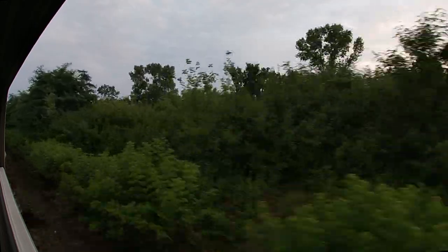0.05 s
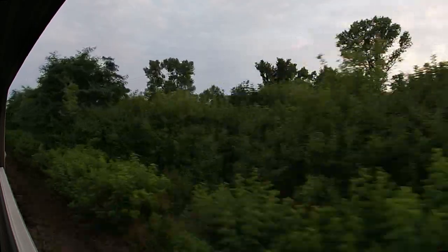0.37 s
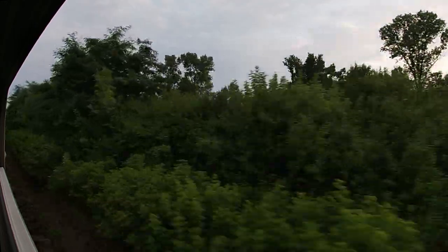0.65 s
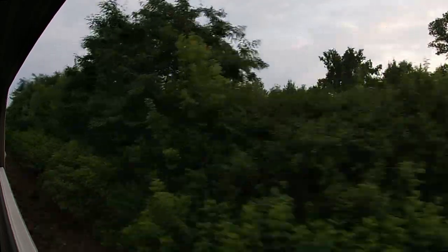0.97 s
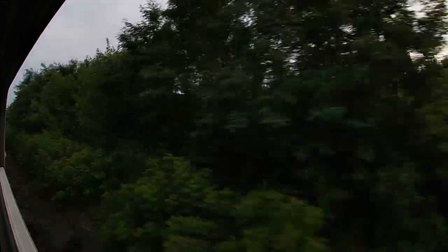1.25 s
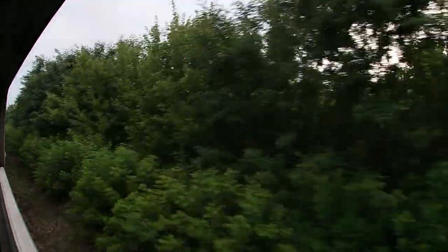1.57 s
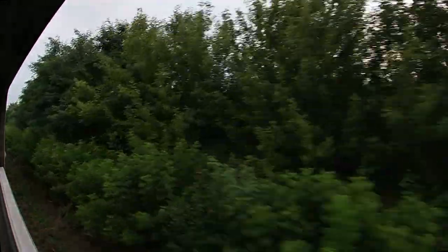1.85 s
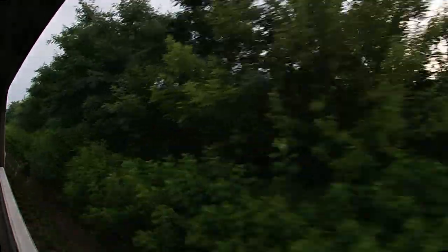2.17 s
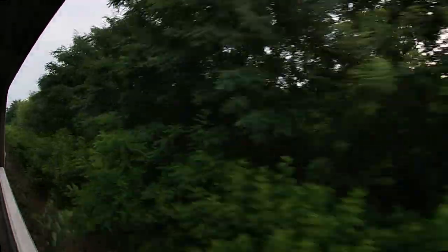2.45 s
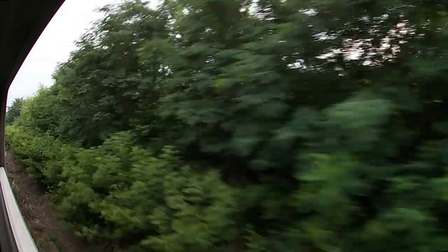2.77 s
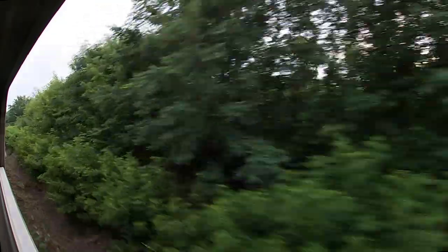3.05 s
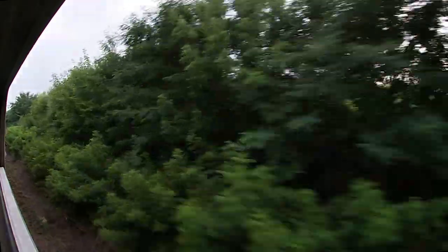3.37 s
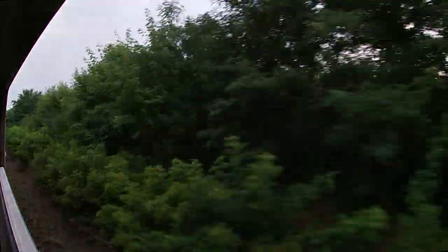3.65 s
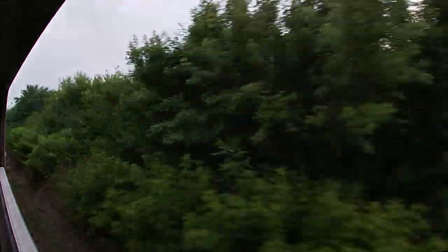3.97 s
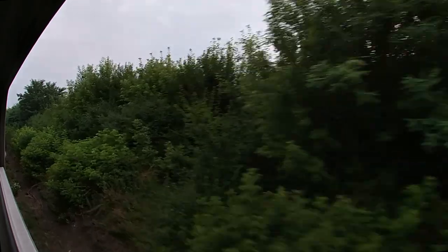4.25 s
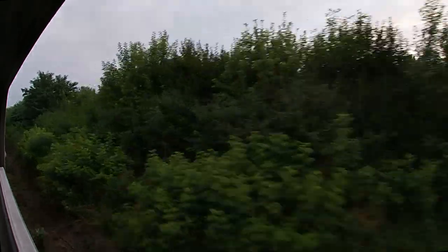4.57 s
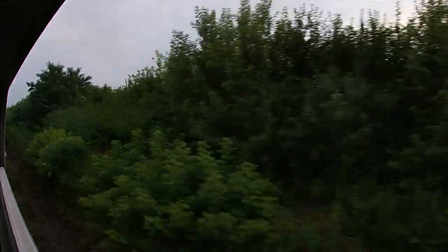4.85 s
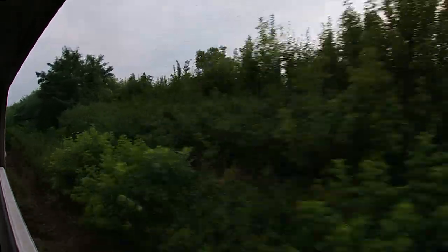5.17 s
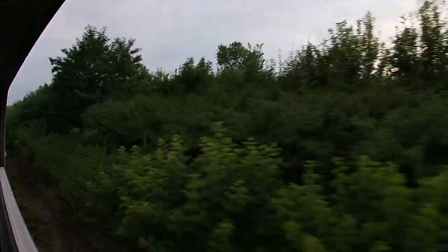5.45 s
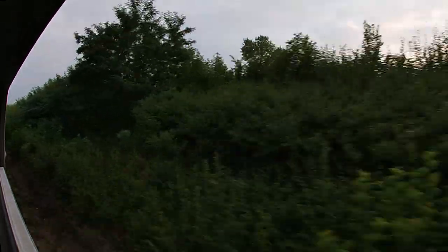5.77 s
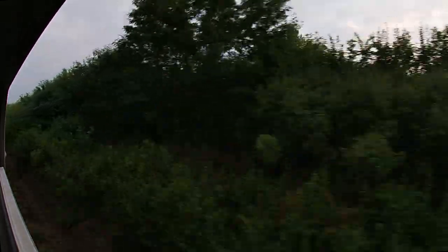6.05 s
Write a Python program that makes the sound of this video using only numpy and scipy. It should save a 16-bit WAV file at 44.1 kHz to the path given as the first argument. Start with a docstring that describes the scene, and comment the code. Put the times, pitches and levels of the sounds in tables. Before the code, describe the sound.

A moving train is heard from an open coach window for about six seconds. Wheels cross rail joints in groups of four clacks, two quick pairs, each group lasting under half a second. The groups begin at about 0.3, 1.3, 2.4, 3.5, 4.5 and 5.6 seconds. Every clack is a gritty steel crash with a short ring, a light rattle and a thud in the coach body, usually heaviest on the fourth hit. Some add a hollow knock, and an extra jolt lands near 4.9 seconds. Underneath runs a steady midrange wheel roar, with rail hiss and a howl that gently swells and fades. Deep, fluttering wind buffets the microphone throughout, with small gusts around 1.9, 2.9, 4.9 and 5.4 seconds. The pace stays even, and the top treble is dulled.

```python
"""Rail joints from an open coach window

Two neighbouring bogies cross a rail joint about once a second, four clacks each time. Every axle
gives a gritty crash, a ring of the wheel and a thud in the coach. Underneath, the wheels roar,
the rails howl and hiss, and air buffets the microphone. The top treble is dulled, and a limiter
ducks a little under the peaks."""
import sys
import numpy as np
from scipy.fft import rfft, irfft, next_fast_len
from scipy.io import wavfile
from scipy.ndimage import uniform_filter1d, minimum_filter1d, map_coordinates

SR = 44100
rng = np.random.default_rng(int(sys.argv[2]) if len(sys.argv) > 2 else 0)


def master_out(mix):
    """Clip the mix to full scale and print it as 16-bit PCM to the path in sys.argv[1]."""
    frames = np.transpose(np.atleast_2d(mix))
    ceiling = np.clip(frames, -1, 1)
    pcm = np.round(ceiling * 32767).astype(np.int16)
    wavfile.write(sys.argv[1], SR, pcm)


N = 273420
TIME = np.arange(N) / SR

# Axle hits, four to a joint: t/s, spray level/dB, rattle level/dB, bite level/dB, ring level/dB,
# thud level/dB
AXLE_HITS = [(0.287, -27, -36, -34, -38, -37), (.388, -31, -37.5, -39.5, -27.5, -23),
             (.602, -27, -35.5, -32, -30, -27), (.703, -28.5, -35.5, -29, -26.5, -15),
             (1.342, -30.5, -40.5, -38, -36, -31), (1.444, -30.5, -39, -36.5, -28.5, -26),
             (1.656, -31, -35.5, -37, -26.5, -20), (1.763, -30.5, -37, -33, -30.5, -14.5),
             (2.406, -27, -40, -38, -30.5, -28), (2.505, -30.5, -36, -46, -30.5, -28),
             (2.717, -28.5, -36.5, -34.5, -24.5, -20), (2.818, -28.5, -36, -37, -29, -13.5),
             (3.456, -32, -39, -40.5, -30.5, -30), (3.557, -31.5, -38, -39, -31.5, -26),
             (3.769, -33.5, -38.5, -39.5, -31.5, -35), (3.87, -34, -38, -41, -32, -15),
             (4.508, -33, -46.5, -47, -34.5, -23), (4.61, -30.5, -36.5, -38, -33, -26),
             (4.822, -26.5, -33, -34.5, -34, -19), (4.921, -33.5, -37.5, -34.5, -26, -15.5),
             (5.554, -31.5, -41.5, -42, -37, -24), (5.653, -32, -38, -39, -35, -28),
             (5.868, -30.5, -34, -35, -24.5, -26), (5.969, -31, -38, -38, -25, -22.5)]
# Tone of a hit's steely bite, rough clank, rattle and bright spray: f/Hz, level/dB
BITE_EQ = [(500, -12.5), (1100, -2), (1750, 1.5), (1920, -4.5), (2080, 6), (2170, -6.5), (2260, 4),
           (2500, -1), (2880, 0.5), (3300, -9.5), (6000, -33.5)]
CLANK_EQ = [(900, -20.5), (1400, -10), (1620, 4.5), (1800, -4.5), (2050, -15), (2800, -19.5), (5000, -49)]
RATTLE_EQ = [(1500, -12), (3100, -6.5), (3700, -0.5), (4000, 0), (4250, -1), (4750, -2.5), (5300, -1.5),
             (5900, -5), (7000, -6.5), (13000, -16)]
SPRAY_EQ = [(2500, -19.5), (5000, -8.5), (7000, -4.5), (9000, 0.5), (11000, 2.5), (13500, -4.5)]

def clacks():
    """The wheel cracks on the rail end, bites, clanks and rings; the gear rattles under a bright spray."""
    times, spray_db, rattle_db, bite_db, ring_db, _ = np.transpose(AXLE_HITS)
    grit = unit(amp(1.5 * wobble(450) + 0.9 * wobble(70)))
    crack_env = blows(times, bite_db, lead=0.012, rise=0.0043, t60=0.12, tail_db=-19, tail_t60=0.2)
    bite_env = blows(times, bite_db, lead=0.0077, rise=0.031, t60=0.5, tail_db=-19, tail_t60=0.65)
    bite = np.hypot(crack_env, bite_env) * noise(eq(BITE_EQ))
    clank = blows(times, ring_db - 5.5, lead=0.0033, rise=0.012, t60=0.1, tail_db=-18.5, tail_t60=0.4)
    clank *= noise(eq(CLANK_EQ))
    rattle = blows(times, rattle_db, lead=0.01, rise=0.028, t60=1.27, tail_db=-14, tail_t60=1.2)
    rattle *= noise(eq(RATTLE_EQ))
    spray = blows(times, spray_db, lead=0.001, rise=0.026, t60=0.5, tail_db=-11, tail_t60=1)
    spray *= noise(eq(SPRAY_EQ))
    ring = blows(times, ring_db, lead=0, rise=0.017, t60=0.11, tail_db=-8.5, tail_t60=1)
    ring *= levelled(wheel(), span_s=0.027)
    return grit * (bite + clank + rattle + spray + sizzle()) + ring


# Ringing modes of the steel wheel: f/Hz, width/Hz, level/dB
WHEEL_MODES = [(1545, 37, 12), (1601, 53, 6), (1720, 68, -16.5), (2020, 54, -8.5), (2200, 150, -19.5),
               (3070, 190, -15)]

def wheel():
    """The wheel's modes sing, wandering a little in pitch as it turns."""
    pace = 1 + 0.008 * wobble(7)
    return map_coordinates(noise(resonances(WHEEL_MODES)), [np.cumsum(pace)], mode="reflect")


# Sizzle accents: peak t/s, half length/s, centre f/Hz, level/dB
SIZZLES = [(2.466, 0.024, 3900, -35), (2.787, .025, 4130, -36), (2.922, .04, 4740, -39),
           (5, 0.031, 4600, -40)]

def sizzle():
    """Loose metal chatters on in the treble after the harder hits."""
    return sum(amp(db) * hump(s, half_s) * noise_band(hz, width_hz=2600)
               for s, half_s, hz, db in SIZZLES)


# Coach body modes: f/Hz, width/Hz, level/dB
BODY_MODES = [(246, 21, -5), (315, 21.6, 0), (385, 45, -3.5), (527, 47, -11)]
# Tone of the boom in floor and walls: f/Hz, level/dB
BOOM_EQ = [(120, -30), (220, -1.5), (320, 12), (430, -5.5), (560, -7.5), (800, -30)]
# One extra jolt of the body on its springs: t/s, level/dB
JOLTS = [(4.852, -17)]

def coach():
    """The weight of each hit: the body thuds, and the floor and walls rumble on briefly."""
    times, *_, thud_db = np.transpose(AXLE_HITS)
    thuds = knocks(times, thud_db, BODY_MODES, lead=0.00702, attack=0.00794)
    boom = blows(times, thud_db - 10.5, lead=0.027, rise=0.011, t60=0.35, tail_db=-19.5, tail_t60=0.6)
    boom *= levelled(noise(eq(BOOM_EQ)), span_s=0.035)
    jolt = knocks(*np.transpose(JOLTS), BODY_MODES, lead=0.007, attack=0.0082)
    return thuds + boom + jolt


# Bogie knock cues: t/s, level/dB
FRAME_KNOCKS = [(.298, -19), (.598, -16.5), (2.408, -20.5), (3.772, -20), (3.874, -18), (5.966, -21)]
# Bogie frame modes: f/Hz, width/Hz, level/dB
FRAME_MODES = [(475, 47, -3.5), (538, 46, 4)]

def bogie():
    """The bogie frame answers some of the hits with a hollow knock."""
    return knocks(*np.transpose(FRAME_KNOCKS), FRAME_MODES, lead=0.002, attack=0.01217)


# Tone of the low and high layers of the rolling roar: f/Hz, level/dB
LOW_ROAR_EQ = [(250, -39), (380, -12.5), (440, -2.5), (500, -1.5), (570, -9), (660, -21.5), (1000, -58.5)]
HIGH_ROAR_EQ = [(420, -28.5), (555, -3.5), (625, 0.5), (700, -4), (795, -1.5), (835, -3.5), (960, -8.5),
                (1030, -13), (1200, -20), (1420, -24.5), (1900, -35), (4000, -64.5)]
# Their fader rides: t/s, level/dB
LOW_ROAR_RIDE = [(0.0, -29), (.9, -21), (1.15, -24.5), (1.4, -25.5), (1.6, -22), (1.9, -23.5), (2.2, -27),
                 (2.4, -23.5), (3.1, -23), (3.5, -26), (4.0, -21.5), (4.1, -27), (4.9, -23.5), (5.3, -26.5),
                 (5.65, -16.5), (5.85, -22), (6.2, -24.5)]
HIGH_ROAR_RIDE = [(0, -18.5), (.5, -23.5), (1, -21.5), (1.35, -22), (1.7, -21), (2.1, -21.5), (2.5, -21),
                  (3.4, -20.5), (3.85, -22), (4.37, -21), (4.7, -19), (5.1, -20.5), (5.6, -23.5),
                  (6.2, -22)]

def roar():
    """Rough steel rolls on rough steel: a midrange bed whose upper layer flickers."""
    low = amp(ride(LOW_ROAR_RIDE)) * levelled(noise(eq(LOW_ROAR_EQ)), span_s=0.21)
    high_db = ride(HIGH_ROAR_RIDE) + 1.46 * wobble(28)
    return low + amp(high_db) * levelled(noise(eq(HIGH_ROAR_EQ)), span_s=0.044)


# Rail resonances: f/Hz, width/Hz, level/dB
RAIL_MODES = [(670.5, 90, 0.5), (744.3, 67, -1)]
# Fader ride of the howl: t/s, level/dB
HOWL_RIDE = [(0, -29), (.48, -23), (.62, -31.5), (1, -25.5), (1.35, -19), (1.65, -25.5), (2.1, -23.5),
             (2.6, -25), (2.95, -21.5), (3.45, -23.5), (3.8, -22.5), (4.37, -19.5), (4.75, -23.5),
             (4.92, -35), (5.15, -30.5), (5.38, -19), (5.6, -21), (6.2, -22)]

def howl():
    """The rippled rail head howls in two narrow, swelling bands."""
    bands = unit(sum(amp(db) * noise_band(hz, width_hz) for hz, width_hz, db in RAIL_MODES))
    return amp(ride(HOWL_RIDE)) * levelled(bands, span_s=0.063)


# Tone of the rail hiss: f/Hz, level/dB
HISS_EQ = [(600, -9.5), (1700, 5), (1950, -1), (2550, 1), (2900, 7), (3200, -1), (3700, 3), (4000, -2.5),
           (4250, 2), (4750, -4), (5150, 0.5), (5800, -5), (9000, -4.5), (13000, -4.5)]
# Its fader ride: t/s, level/dB
HISS_RIDE = [(0, -36), (.5, -38.5), (1.1, -35), (1.6, -37), (2.1, -36.5), (2.22, -37.5), (2.4, -35.5),
             (2.9, -36), (3.15, -37.5), (3.7, -35.5), (4.25, -36.5), (4.45, -37.5), (5.25, -35.5),
             (5.45, -37), (6.2, -36)]

def hiss():
    """The rails hiss, lifting about 1 dB just after each group of four clacks."""
    swell_db = sum(hump(s + 0.62, half_s=0.38) for s, *_ in AXLE_HITS[::4])
    return amp(ride(HISS_RIDE) + swell_db + 0.66 * wobble(30)) * noise(eq(HISS_EQ))


# Tone of the wind's buffeting and flutter: f/Hz, level/dB
BUFFET_EQ = [(8, -11), (20, -2), (36, -3), (80, -4.5), (115, -12.5), (200, -36.5), (500, -85.5)]
FLUTTER_EQ = [(60, -25.5), (105, -1.5), (130, -3), (165, -5), (250, -9), (380, -11.5), (700, -20.5),
              (2000, -67.5)]
# Gusts and lulls in the buffeting: t/s, level change/dB
GUSTS = [(.2, 2.5), (1.86, 3), (2.86, 3.5), (4.88, 4.5), (5.23, -3.5), (5.38, 4.5), (5.47, -6), (5.81, -10)]
# Fader ride of the flutter: t/s, level/dB
FLUTTER_RIDE = [(0, -19), (.25, -21), (.6, -22), (.85, -22), (1.1, -23), (1.5, -23.5), (1.9, -20),
                (2.3, -23.5), (2.7, -26), (3.1, -23.5), (3.42, -19), (3.75, -23.5), (4.1, -21.5),
                (4.5, -24), (4.85, -22), (5.3, -25.5), (5.78, -24.5), (5.9, -19), (6.2, -23.5)]

def air():
    """Eddies at the window frame: deep, gusty buffeting and a lighter flutter above it."""
    eddy_db, eddies_per_s = 1.5, 16
    gust_db = sum(db * hump(s, half_s=0.062) for s, db in GUSTS)
    buffet_db = -17 + gust_db + eddy_db * wobble(eddies_per_s)
    buffet = amp(buffet_db) * levelled(noise(eq(BUFFET_EQ)), span_s=0.17)
    flutter_db = ride(FLUTTER_RIDE) + eddy_db * wobble(eddies_per_s)
    flutter = amp(flutter_db) * levelled(noise(eq(FLUTTER_EQ)), span_s=0.11)
    return buffet + flutter


def blows(times, levels_db, lead, rise, t60, tail_db, tail_t60):
    """Hit envelope, times in s: a swell, a fall and a weaker tail from under the coach; powers add."""
    power = np.zeros(N)
    for s, db in zip(times, levels_db):
        start = max(round((s - lead) * SR), 0)
        t = TIME[:min(SR, N - start)]
        swell = np.sin(np.pi / 2 * np.minimum(t / rise, 1))
        age = np.maximum(t - rise, 0)
        fall = 1e-6 ** (age / t60) + amp(tail_db) ** 2 * 1e-6 ** (age / tail_t60)
        power[start:start + len(t)] += amp(db) ** 2 * swell ** 2 * fall
    return np.sqrt(power)


def knocks(times, levels_db, modes, lead, attack):
    """Each hit sets a body's low modes swinging, with slight scatter in pitch and level; times in s."""
    out = np.zeros(N + SR)
    t = TIME[:SR // 4]
    for s, hit_db in zip(times, levels_db):
        start = round((s - lead) * SR)
        for hz, width_hz, db in modes:
            detune, scatter_db = rng.standard_normal(2)
            decay = (1 - np.exp(-t / attack)) ** 2 * np.exp(-np.pi * width_hz * t)
            swing = np.sin(2 * np.pi * hz * (1 + 0.021 * detune) * (t - attack))
            out[start:start + len(t)] += amp(hit_db + db + scatter_db) * decay / decay.max() * swing
    return out[:N]


def amp(db):
    """Decibels to gain."""
    return 10 ** (np.asarray(db) / 20)


def unit(x):
    """Scale to rms 1."""
    return x / np.sqrt(np.mean(x ** 2) + 1e-20)


def eq(points):
    """EQ curve through f/Hz, level/dB points on a log frequency axis."""
    f, db = np.transpose(points)
    return lambda hz: amp(np.interp(np.log(hz + 1), np.log(f + 1), db))


def resonances(modes):
    """Response of a resonator bank: f/Hz, width/Hz, level/dB."""
    return lambda f: sum(amp(db) * 1j * f * width / (hz * hz - f * f + 1j * f * width)
                         for hz, width, db in modes)


def ride(points):
    """Fader position at every sample, from t/s, level/dB points."""
    return np.interp(TIME, *np.transpose(points))


def hump(centre_s, half_s):
    """A bell-shaped swell from 0 to 1 and back."""
    return np.exp(-((TIME - centre_s) / half_s) ** 2)


def wobble(rate):
    """Smooth random modulation, rate points a second."""
    return map_coordinates(rng.standard_normal(int(N * rate / SR) + 4), [TIME * rate])


def filtered(x, response):
    """Play x through a frequency response."""
    size = next_fast_len(N + SR // 2)
    return irfft(rfft(x, size) * response(np.fft.rfftfreq(size, 1 / SR)), size)[:N]


def noise(response):
    """Coloured noise of rms 1."""
    return unit(filtered(rng.standard_normal(N), response))


def noise_band(hz, width_hz):
    """Noise through the same resonator twice, for steep skirts."""
    return noise(lambda f: resonances([(hz, width_hz, 0)])(f) ** 2)


def levelled(x, span_s):
    """Hold the running rms near 1."""
    power = uniform_filter1d(x ** 2, max(int(span_s * SR), 2))
    return x / np.sqrt(np.abs(power) + 1e-9)


def scene():
    """Mono mix at the window: clacks and thumps over a bed of wind, rolling and faint wheel song."""
    thumps = coach() + bogie()
    bed = air() + roar() + howl() + hiss()
    wheel_song = amp(-37 + 1.6 * wobble(13)) * wheel()
    return (clacks() + thumps + bed + wheel_song)[None]


def limiter(x, ceiling_db, hold_s):
    """Gain drops just before a peak and recovers after it."""
    needed_gain = np.minimum(1, amp(ceiling_db) / (np.abs(x) + 1e-9))
    span = max(int(hold_s * SR), 2)
    return x * uniform_filter1d(minimum_filter1d(needed_gain, span), span)


# Treble roll-off of the microphone: f/Hz, level/dB
MIC_EQ = [(5500, 0), (5950, -2), (6400, -12.5), (6900, -18.5), (9400, -22), (9900, -25), (11000, -26.5),
          (12000, -31), (13500, -37.5)]

def record(dry):
    """Master chain: microphone colour, limiter and a brick-wall high cut."""
    dulled = filtered(dry[0], eq(MIC_EQ))
    limited = limiter(dulled, ceiling_db=-2.3, hold_s=0.012)
    return filtered(limited, lambda hz: hz < 13780)[None]


dry = scene()
out = record(dry)
master_out(out)
```